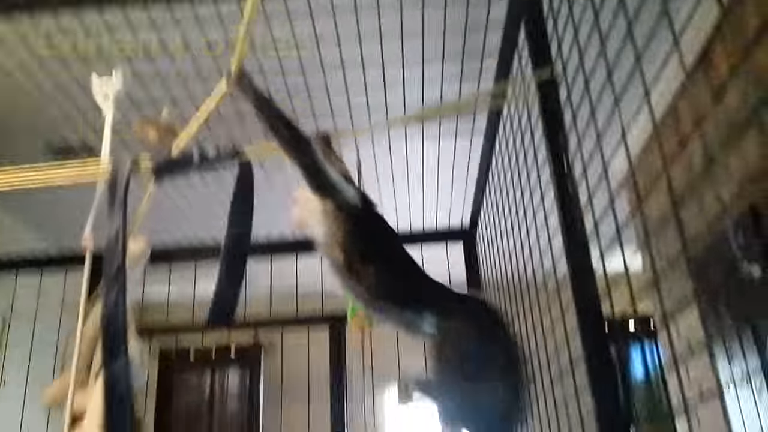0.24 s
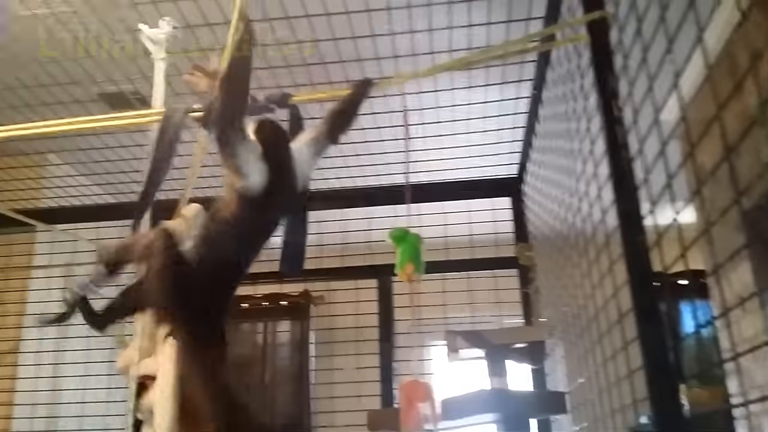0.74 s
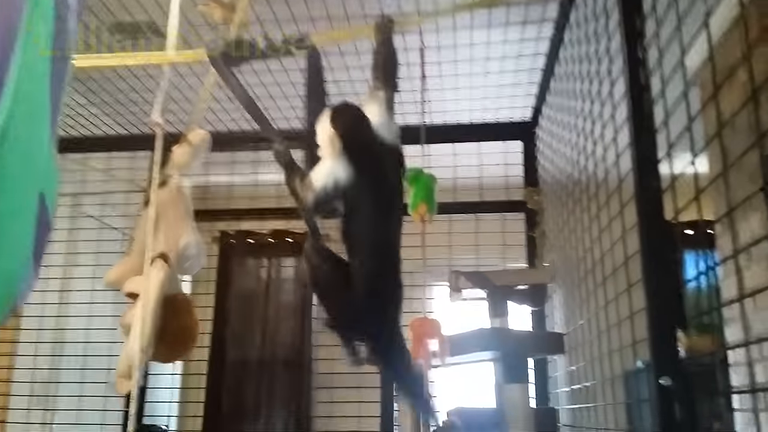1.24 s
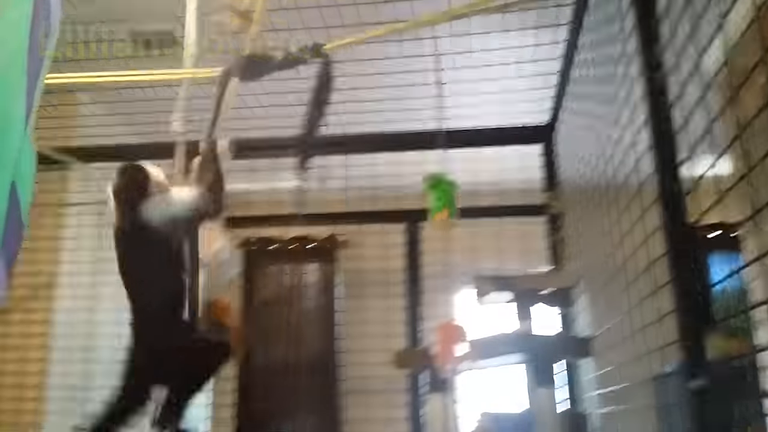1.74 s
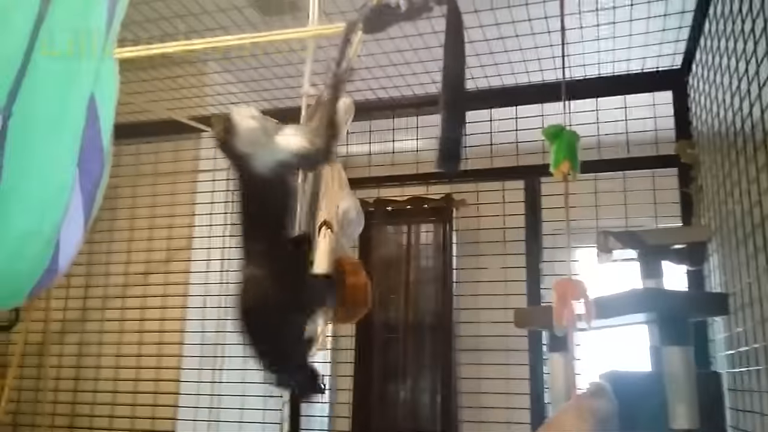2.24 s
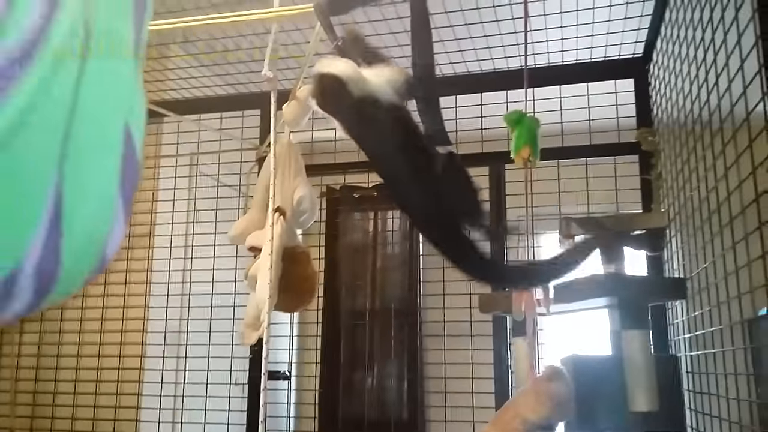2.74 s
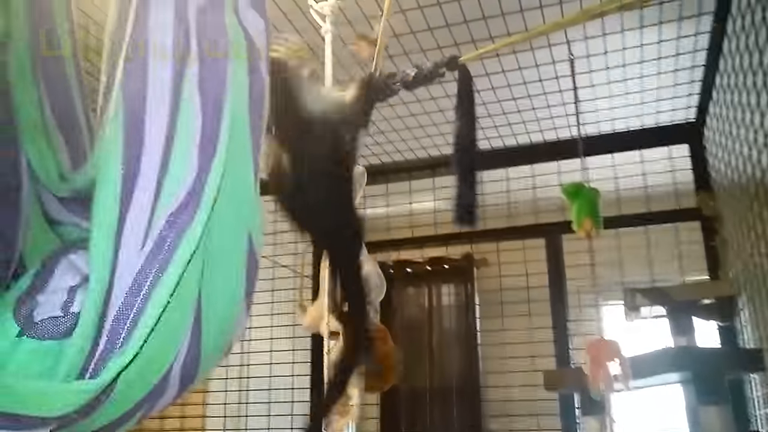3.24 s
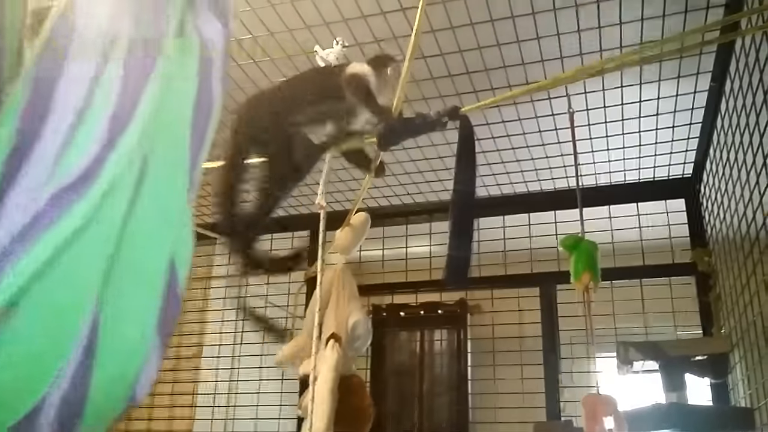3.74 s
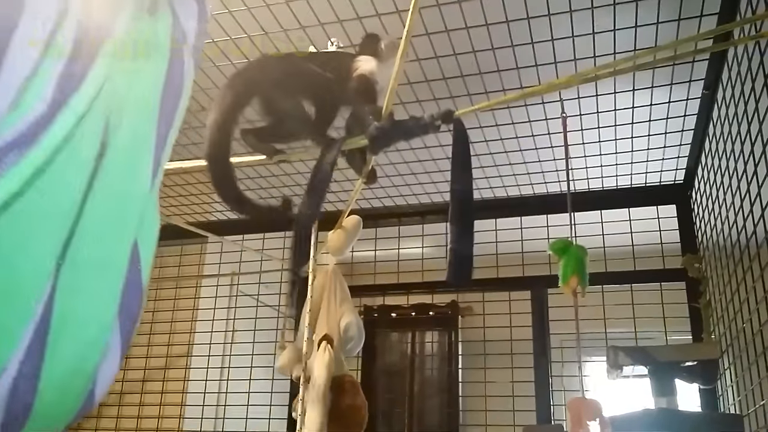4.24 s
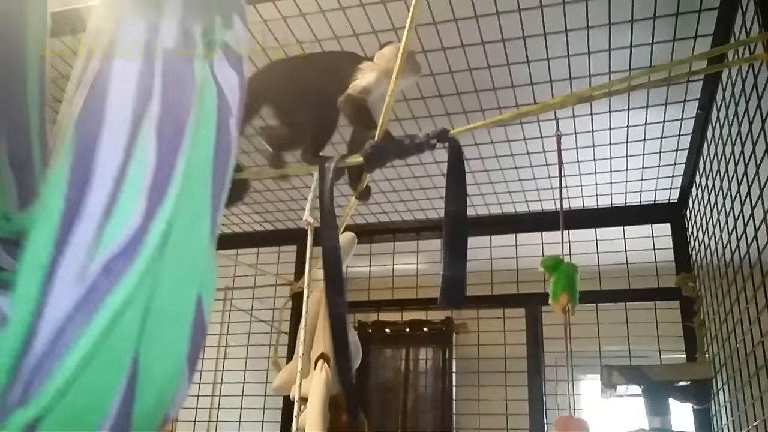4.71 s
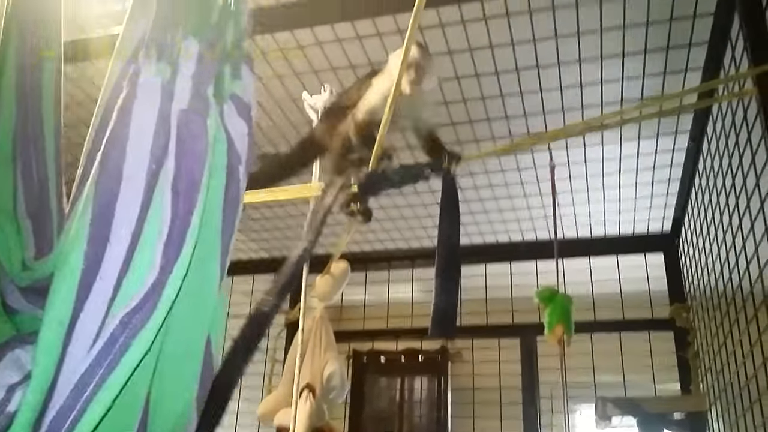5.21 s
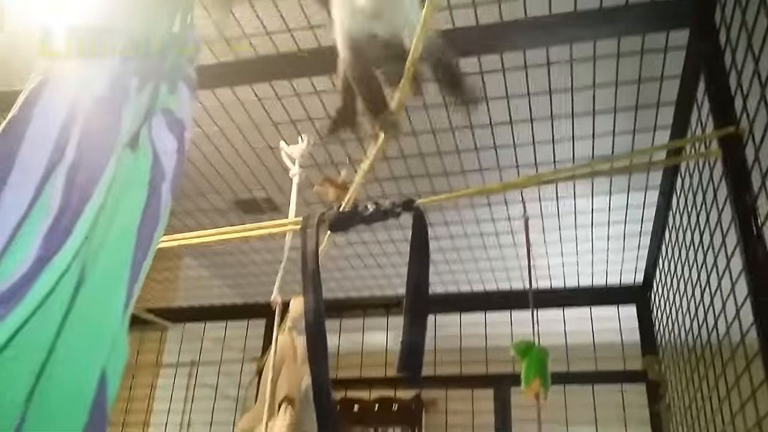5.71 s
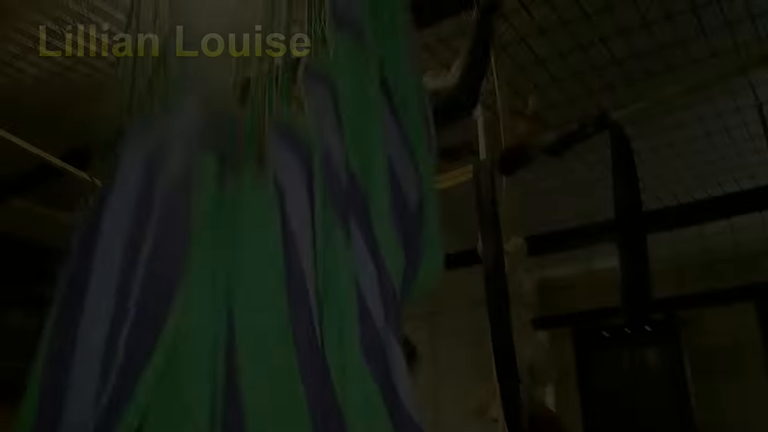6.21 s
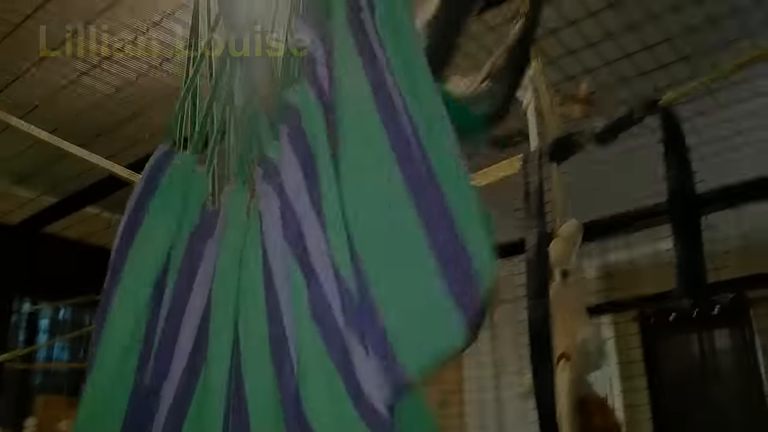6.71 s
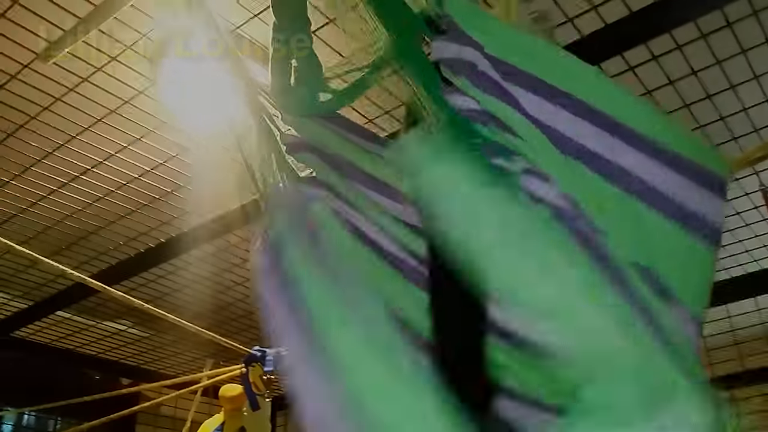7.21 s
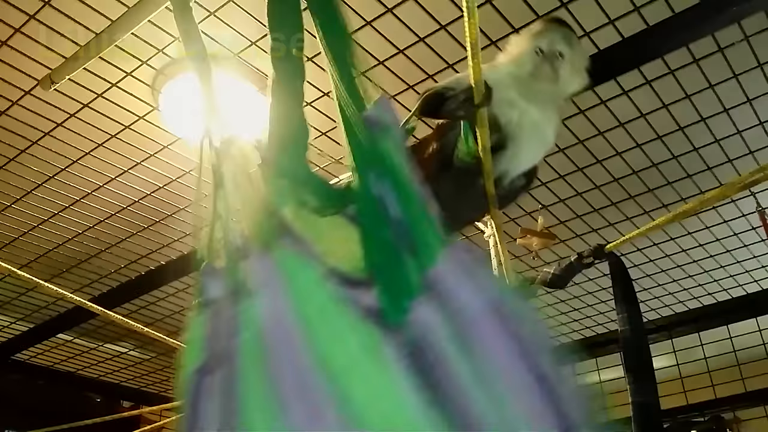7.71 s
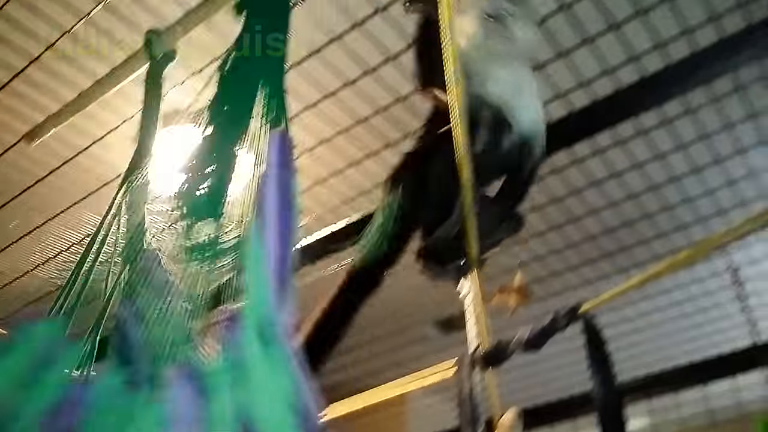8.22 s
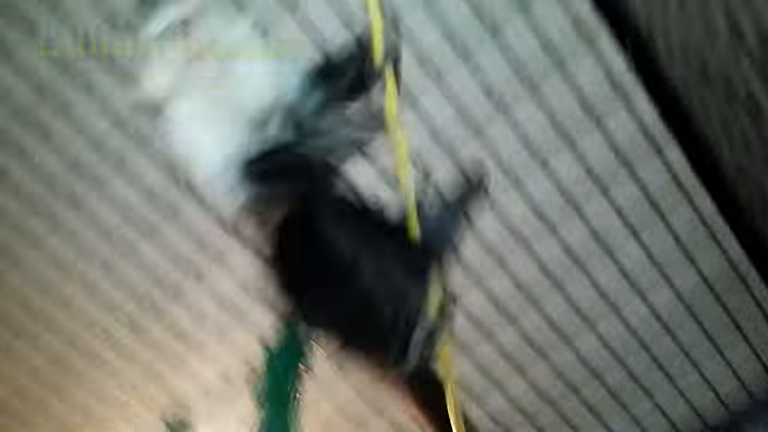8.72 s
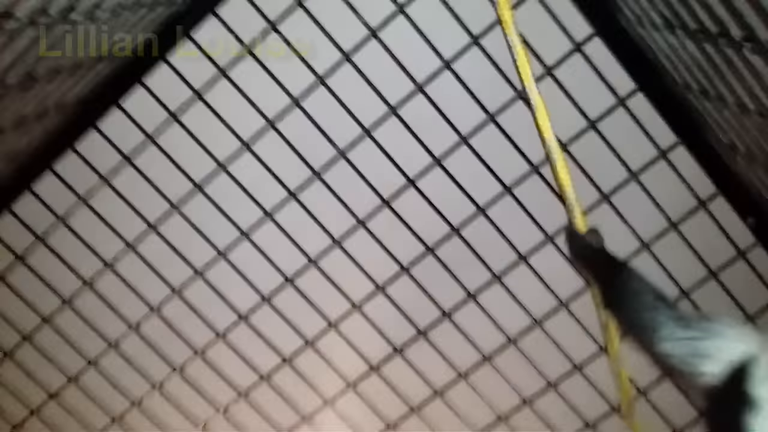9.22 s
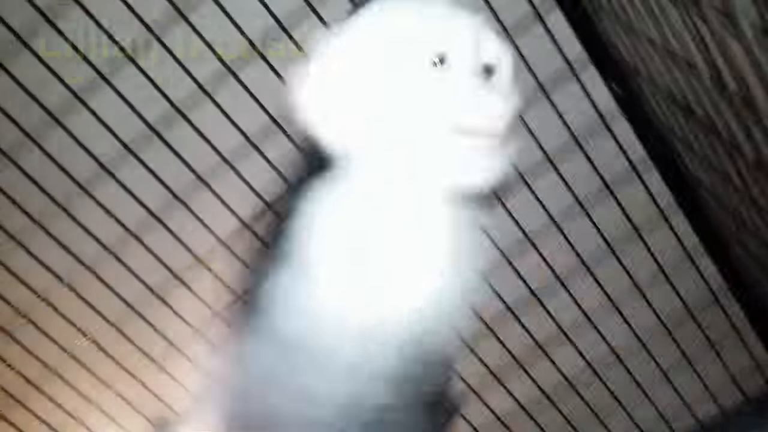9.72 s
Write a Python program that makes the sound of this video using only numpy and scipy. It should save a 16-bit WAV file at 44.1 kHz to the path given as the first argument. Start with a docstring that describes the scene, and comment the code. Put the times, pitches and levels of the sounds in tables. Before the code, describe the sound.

Inside a wire enclosure with a slight room echo, a monkey scrambles about, making soft thuds, rope scuffs and small rattles of the mesh. It chirps in quavering, sliding notes and soft whines almost throughout, breaking into three very short, louder shrieks in the second half. Close clicks and brushing on the microphone come at the opening and most sharply at the end, over a faint rumble and rustle.

```python
"""A small monkey scrambles about a wire-mesh enclosure in a hard-walled room.
First the listening phone is tapped and brushed. From 0.7 s the monkey twitters in gliding whistles,
with reedy whines between, while its hands and feet scuff ropes and set the mesh ringing.
At 3.7 s a bump makes the phone's support hum. Near 5.0, 5.7 and 8.4 s air forced through a tight throat
gives harsh shrieks. Sharp taps on the phone end the scene. Throughout, the phone turns the pauses down."""
import sys
import numpy as np
from scipy import signal
from scipy.fft import irfft, next_fast_len
from scipy.io import wavfile
from scipy.ndimage import uniform_filter1d

SR = 44100
rng = np.random.default_rng(int(sys.argv[2]) if len(sys.argv) > 2 else 0)


def waveform_to_disk(signal):
    """Save audio, clipped to [-1, 1], as 16-bit WAV at the path in sys.argv[1]."""
    frames = np.transpose(np.atleast_2d(signal))
    scaled = np.clip(frames, -1, 1) * 32767
    samples = np.round(scaled).astype(np.int16)
    wavfile.write(sys.argv[1], SR, samples)


N = 438787
TIME = np.arange(N) / SR


def from_db(db):
    """Amplitude ratio of a level: tenfold for every 20 dB."""
    return np.exp(np.asarray(db) * (np.log(10) / 20))


def rms_one(x):
    """Normalisation to unit mean power."""
    return x / np.sqrt(np.mean(x ** 2) + 1e-20)


def at_hz(points, hz):
    """Interpolation on a logarithmic frequency axis."""
    freqs, values = np.transpose(points)
    return np.interp(np.log(np.maximum(hz, 1)), np.log(freqs), values)


def drift(corner_hz):
    """Random fluctuation: low-pass filtered noise of unit power."""
    pole = np.exp(-80 * np.pi * corner_hz / SR)
    white = rng.standard_normal(N // 40 + 2002)   # one value every 40 samples
    slow = signal.lfilter([1], [1, -2 * pole, pole * pole], white)[2000:]
    return np.interp(np.arange(N) / 40, np.arange(len(slow)), rms_one(slow))


def noise(spectrum, size=N):
    """Spectral shaping of white noise, at unit power."""
    padded = next_fast_len(size, real=True)
    hz = np.fft.rfftfreq(padded, 1 / SR)
    white = rng.standard_normal(len(hz)) + 1j * rng.standard_normal(len(hz))
    return rms_one(irfft(white * from_db(at_hz(spectrum, hz)), padded)[:size])


def stereo_noise(spectrum, correlation):
    """Partial coherence: the sum of an in-phase and an antiphase noise."""
    common = np.sqrt((1 + correlation) / 2) * noise(spectrum)
    opposed = np.sqrt((1 - correlation) / 2) * noise(spectrum)
    return common + opposed * [[1], [-1]]


def impulses(rows):
    """Ideal impacts: one impulse for each (t/s, level/dB)."""
    out = np.zeros(N)
    for t, db in rows:
        out[min(int(t * SR), N - 1)] += from_db(db)
    return out


def ring(force, modes):
    """Modal superposition: each blow excites every damped mode with a random strength."""
    out = 0
    for hz, db, t60 in modes:
        r, w = from_db(-60 / (t60 * SR)), 2 * np.pi * hz / SR   # pole radius and angle
        blows = force * from_db(db + 2 * rng.standard_normal(N))
        out = out + signal.lfilter([0, np.sin(w)], [1, -2 * r * np.cos(w), r * r], blows + 1e-18)
    return out


def swell(t, half_length, rise=1):
    """Gaussian envelope about t, its rise time scaled by `rise`: samples covered and gain."""
    span = np.flatnonzero(abs(TIME - t) < 4 * half_length)
    lag = (TIME[span] - t) / half_length
    return span, np.exp(-.5 * np.where(lag < 0, lag / rise, lag) ** 2)


def envelope(t, length, attack_s, release_s):
    """Attack, hold and exponential decay: samples covered, time since onset and gain."""
    span = np.arange(max(int(t * SR), 0), min(int((t + length + 8 * release_s) * SR), N))
    age = np.maximum(TIME[span] - t, 0)
    rise = np.sin(np.pi / 2 * np.minimum(age / attack_s, 1))
    return span, age, rise * np.exp(-np.maximum(age - length, 0) / release_s)


def strokes(rows):
    """Upper envelope of events (t/s, length/s, level/dB, attack/s, release/s)."""
    gain = np.zeros(N)
    for t, length, db, attack_s, release_s in rows:
        span, _, shape = envelope(t, length, attack_s, release_s)
        gain[span] = np.maximum(gain[span], from_db(db) * shape)
    return gain


def glides(notes, attack_s, release_s, sag_db):
    """Pitch and gain of one throat: each note glides exponentially and loses sag_db on the way."""
    pitch, gain = np.full(N, float(notes[0][2])), np.zeros(N)
    for t, length, first_hz, last_hz, db in notes:
        span, age, shape = envelope(t, length, attack_s, release_s)
        along = np.minimum(age / length, 1)
        pitch[span] = first_hz * (last_hz / first_hz) ** along
        gain[span] = np.maximum(gain[span], from_db(db - sag_db * (along - 1.5)) * shape)
    return pitch, gain


def room(x, direct_db, lag_s):
    """Reverberation: direct sound reaches the left port first; reflections last longest in the bass."""
    decay_times = [(100, 0.93), (1000, 0.33), (2500, 0.31), (5500, 0.27), (9000, 0.31), (16000, 0.2)]   # reverberation time: f/Hz, T60/s
    t = TIME[:int(.7 * SR)]
    edges_hz = np.geomspace(60, 17000, 9)
    white, tail = rng.standard_normal((2, len(t))), 0
    for low, high in zip(edges_hz, edges_hz[1:]):
        band = signal.sosfilt(signal.butter(2, [low, high], "band", fs=SR, output="sos"), white)
        tail = tail + band * np.exp(-np.log(1000) * t / at_hz(decay_times, np.sqrt(low * high)))
    tail = tail * (t > .002)
    response = tail / np.sqrt(np.sum(tail ** 2, axis=1, keepdims=True))
    response[0, 0] += from_db(direct_db)
    response[1, int(lag_s * SR)] += from_db(direct_db)
    return signal.fftconvolve(x[None], response, axes=1)[:, :N] / np.hypot(1, from_db(direct_db))


def hiss(level_db=-71):
    """Self-noise of the microphone: steady and nearly incoherent between the sides."""
    spectrum = [(100, 4), (500, 15.5), (2000, 6.5), (6000, -8.5), (10000, 0.5), (15500, 3)]   # microphone noise: f/Hz, level/dB
    return from_db(level_db) * stereo_noise(spectrum, correlation=.1)


def background(rumble_db=3, rustle_db=3, rest_db=-71, attack_s=.03, release_s=.035, rustle_exponent=1.31):
    """Modulated noise floor: low rumble and rustle swell around the calls and sink in the pauses."""
    rises = [(.06, .14, -70), (0.65, 0.73, -66.5), (1.456, 0.51, -67), (2.042, 0.58, -64.5),
             (3.16, 0.34, -74), (3.38, .19, -68.5), (3.738, 0.078, -61.5), (3.971, 0.21, -67.5),
             (4.35, 0.74, -68.5), (4.994, 0.26, -63.5), (5.306, .16, -68), (5.626, 0.19, -66.5),
             (5.968, 0.48, -68), (6.52, 0.43, -69.5), (7.006, 0.26, -68), (7.289, 2.02, -66),
             (8.968, .24, -62), (9.215, 0.28, -66.5), (9.865, 0.055, -64.5)]   # swells of the background: t/s, length/s, level/dB
    rumble_spectrum = [(20, -25), (35, -31.5), (58, 6), (95, -2.5), (150, 2.5), (235, 3), (370, -3),
                       (525, -7.5), (900, -10.5), (1300, -14), (2500, -77.5)]   # background rumble: f/Hz, level/dB
    rustle_spectrum = [(300, -9), (700, -11), (1500, -6), (3000, -6), (6000, -10.5), (8500, -17.5),
                       (15500, -32)]   # background rustle: f/Hz, level/dB
    rumble_gain = np.hypot(from_db(rest_db), strokes([(*rise, attack_s, release_s) for rise in rises]))
    rustle_gain = rumble_gain * rms_one(rumble_gain) ** (rustle_exponent - 1)
    rumble = from_db(rumble_db + 1.5 * drift(26)) * stereo_noise(rumble_spectrum, correlation=.5)
    rustle = from_db(rustle_db + 1.5 * drift(50)) * stereo_noise(rustle_spectrum, correlation=.08)
    return rumble_gain * rumble + rustle_gain * rustle


def thuds(level_db=-10):
    """Structure-borne sound: soft landings excite the low modes of the frame."""
    landings = [(0.275, -58), (0.664, -74), (1.467, -46.5), (1.797, -52), (2.141, -49), (2.591, -49),
                (3.089, -51), (5.208, -57), (7.698, -44.5), (9.029, -48), (9.212, -39), (9.887, -56)]   # blows on the frame: t/s, level/dB
    modes = [(62, -26, 0.13), (159, -4.5, 0.17), (255, -2.5, 0.16), (320, 1, 0.13), (460, -6, 0.1),
             (590, 0.5, 0.045)]   # frame resonances: f/Hz, level/dB, T60/s
    return from_db(level_db) * ring(impulses(landings), modes)


def brushes(level_db=6.5, grain_db=1.5):
    """Friction noise of fur and cloth sliding over the phone."""
    contacts = [(.075, 0.14, -60.5, 0.084, 0.016), (5.958, 0.01, -50.5, 0.015, 0.047),
                (8.873, 0.025, -55.5, 0.015, 0.027), (9.182, .16, -50.5, 0.029, 0.038)]   # brushing strokes: t/s, length/s, level/dB, attack/s, release/s
    spectrum = [(880, -20), (1500, -24), (2030, -9), (2470, -13.5), (2670, -10), (3000, -7.5), (3610, -13),
                (5560, -2.5), (7600, -12.5), (15500, -18)]   # friction on the case: f/Hz, level/dB
    gain = strokes(contacts) * from_db(level_db + grain_db * drift(52))
    return gain * stereo_noise(spectrum, correlation=.077)


def ticks():
    """Impulse response of the phone's case: taps excite high, strongly damped modes."""
    taps = [(.072, -20.5), (3.181, -39), (7.739, -25), (9.138, -20.5), (9.159, -21.5), (9.931, -16.5),
            (9.936, -14.5), (9.940, -26)]   # blows on the case: t/s, level/dB
    modes = [(2740, -43, 0.026), (3870, -36, 0.023), (5170, -13.5, 0.0054), (7000, -37, 0.021)]   # case resonances: f/Hz, level/dB, T60/s
    return ring(impulses(taps), modes)


def bump(t=3.733, length_s=.13, attack_s=.06, level_db=-36, ring_db=-21, rattle_db=-11, judder_db=2):
    """Resonance of the phone's bumped support: the pitch climbs as the contact stiffens."""
    rattle_spectrum = [(100, -31.5), (180, -14), (500, -5), (950, -10), (1400, -13), (2000, -4.5),
                       (3000, -17.5), (5500, -32), (9000, -54)]   # faint rattle riding on the hum: f/Hz, level/dB
    first_hz, firm_hz, firming_s, sag_db_per_s = 220, 320.7, .018, 108
    age = np.maximum(TIME - t, 0)
    pitch = firm_hz + (first_hz - firm_hz) * np.exp(-age / firming_s)
    hum = np.sqrt(2) * np.sin(2 * np.pi * np.cumsum(pitch) / SR) * from_db(judder_db * drift(64))
    rattle = from_db(rattle_db) * stereo_noise(rattle_spectrum, correlation=.7)
    contact = strokes([(t, length_s, level_db, attack_s, .0025)]) * from_db(-sag_db_per_s * age)
    ringing = strokes([(t, length_s, level_db + ring_db, attack_s, .05)])   # outlasts the contact
    return (contact + ringing) * (hum + rattle)


def scuffs(level_db=-1, grain_db=4, skirt_db=-20):
    """Sliding friction around one broad resonance; short slips start abruptly, long slides swell."""
    slides = [(1.34, -48.5, 0.023, 3780), (1.517, -51, 0.035, 1903), (1.717, -48, 0.039, 1870),
              (1.82, -44, 0.027, 1860), (1.929, -55.5, 0.042, 2120), (2.061, -51.5, 0.044, 1563),
              (2.422, -49, 0.035, 2760), (2.606, -52, 0.011, 1410), (3.35, -60.5, 0.012, 3190),
              (3.48, -54.5, 0.034, 4300), (3.526, -50.5, 0.018, 2750), (4.046, -52.5, 0.032, 3490),
              (4.185, -45.5, 0.015, 3240), (4.515, -45.5, 0.031, 3050), (4.597, -45, 0.044, 2620),
              (4.751, -40, 0.011, 4050), (5.456, -50.5, 0.028, 1800), (6.389, -47.5, 0.017, 3620),
              (6.531, -55, 0.019, 4640), (6.849, -42.5, 0.017, 3400), (7.14, -53.5, 0.02, 1800),
              (7.323, -45.5, 0.016, 3540), (7.707, -53, 0.05, 2170), (7.886, -51, 0.047, 2500),
              (8.686, -39.5, 0.043, 4000), (8.998, -34, 0.016, 4150), (9.902, -54.5, 0.018, 4050)]   # hands and feet on rope and wire: t/s, level/dB, half length/s, f/Hz
    out = np.zeros(N)
    for t, db, half_length, hz in slides:
        span, shape = swell(t, half_length, rise=min(1, half_length / .021))
        spectrum = [(hz / 6, skirt_db), (hz / 1.615, -3), (hz * 1.18, 0),
                    (hz * 1.785, skirt_db), (hz * 4, -38)]
        out[span] += from_db(db + level_db) * shape * noise(spectrum, len(span))
    return out * rms_one(from_db(grain_db * drift(250)))


def mesh(level_db=-9, chatter_per_s=400, settle_s=.025, chatter_db=-6):
    """Impact excitation: a grab rings the panel, and crossed wires chatter until it settles."""
    grabs = [(0.666, -52), (1.329, -52.5), (1.469, -62), (1.713, -46.5), (1.804, -41.5), (1.899, -53),
             (2.592, -42), (3.087, -58), (3.444, -70), (4.74, -52.5), (5.469, -69), (6.378, -69),
             (7.701, -60), (8.981, -49), (9.209, -37.5)]   # blows on the mesh: t/s, level/dB
    modes = [(507, -14, 0.027), (794, -5.5, 0.17), (1070, -2, .03), (1162, -1.5, 0.082),
             (1587, -12.5, 0.041), (2027, 20, 0.022), (2530, 0, 0.024), (2700, -3.5, 0.018),
             (4030, 6.5, 0.016), (4100, -1.5, 0.018), (5300, -2, 0.024)]   # wire panel, damped by its fixings: f/Hz, level/dB, T60/s
    blows = impulses(grabs)
    shaking = signal.lfilter([1], [1, -np.exp(-1 / (settle_s * SR))], blows + 1e-18)
    touches = (rng.random(N) < chatter_per_s / SR) * rng.standard_normal(N)
    return from_db(level_db) * ring(blows + from_db(chatter_db) * shaking * touches, modes)


def whines(level_db=6, flutter_db=4):
    """Formant filtering: the throat favours harmonics of a wavering, reedy tone near 2 and 4 kHz."""
    notes = [(.065, 0.15, 812, 767, -72), (1.135, 0.18, 885, 1058, -54.5), (1.49, 0.08, 1380, 1293, -52.5),
             (3.225, 0.19, 959, 1031, -65.5), (3.46, 0.089, 1015, 951.6, -55.5),
             (5.485, .1, 1079, 1040, -61), (5.61, 0.042, 1055, 1019, -46), (7.005, 0.097, 1238, 1310, -59),
             (7.125, 0.073, 1046, 972.5, -55), (7.35, .125, 1285, 1492, -55),
             (7.55, 0.26, 1077, 1011, -51.5), (8.565, 0.039, 870, 927, -58), (8.63, .14, 965, 1400, -53.5)]   # soft whines: t/s, length/s, first f/Hz, last f/Hz, level/dB
    formants = [(1400, -9), (2000, 4.5), (2700, -12.5), (3200, -15), (4050, 0), (4800, -8), (5400, -22),
                (6700, -20.5), (7500, -42)]   # throat resonances: f/Hz, level/dB re the fundamental
    pitch, gain = glides(notes, attack_s=.006, release_s=.008, sag_db=-3)
    on = gain > 0
    wavering_hz = pitch * (1 + .016 * drift(70) + .012 * drift(400))
    phase = 2 * np.pi * np.cumsum(wavering_hz)[on] / SR
    overtones = sum(from_db(at_hz(formants, k * pitch[on])) * np.sin(k * phase) for k in range(2, 6))
    tone = np.zeros(N)
    tone[on] = np.sin(phase) + overtones
    flutter = rms_one(from_db(flutter_db * drift(30))) * (1 + .3 * drift(350))
    return gain * tone * flutter * from_db(level_db)


def shrieks(level_db=3.5, rough_db=4):
    """Source and filter: air forced through a tight throat in chaotic pulses excites its resonance."""
    cries = [(5.039, -22.5, 0.023, 4440), (5.676, -30.5, 0.021, 7360), (8.371, -20.5, .017, 6030)]   # harsh cries: t/s, level/dB, half length/s, throat resonance f/Hz
    spectrum = [(300, -45), (900, -29), (1400, -18), (2000, -6), (3000, -4), (4200, -1), (5700, 0),
                (6700, -1), (7500, -17), (9500, -21), (12000, -28), (15500, -33)]   # colour common to the cries: f/Hz, level/dB
    out = np.zeros(N)
    hz = np.geomspace(300, 16000, 80)
    for t, db, half_length, throat_hz in cries:
        span, shape = swell(t, half_length)
        formant_db = 8 / (1 + (np.log2(hz / throat_hz) / .2) ** 2)
        breath = noise(np.c_[hz, at_hz(spectrum, hz) + formant_db], len(span))
        out[span] += from_db(db + level_db) * shape * breath
    return out * rms_one(from_db(rough_db * drift(400)))


def twitter(level_db=0, flutter_db=4, overtone_db=-17, hoarse_db=-6, rasp_db=-5):
    """Amplitude modulation: irregular shaking of the folds puts side bands around a quavering whistle."""
    notes = [(.678, .036, 3850, 4100, -38), (.728, 0.051, 2380, 2614, -44.5),
             (.787, 0.036, 2867, 3354, -40.5), (.83, 0.053, 2500, 2097, -43.5),
             (.938, 0.033, 4590, 4796, -46.5), (.978, 0.039, 4510, 3874, -38.5),
             (1.03, 0.052, 2910, 2464, -57.5), (1.09, 0.1, 2030, 1782, -46),
             (1.21, 0.16, 2245, 1873, -51.5), (1.965, 0.058, 1746, 2140, -52.5),
             (2.035, 0.052, 4350, 4514, -50), (2.112, 0.033, 3760, 4350, -36),
             (2.155, .10, 3140, 2050, -47.5), (2.26, 0.12, 1946, 1760, -51),
             (2.375, .018, 2305, 2450, -39.5), (2.395, 0.053, 3905, 5040, -37.5),
             (2.45, 0.047, 2693, 1864, -36.5), (2.51, 0.033, 2917, 3453, -40),
             (2.55, 0.053, 2660, 2253, -37.5), (3.975, 0.063, 3550, 2900, -56),
             (4.04, 0.098, 2260, 1746, -48.5), (4.385, 0.11, 2140, 1900, -51),
             (4.57, 0.14, 1627, 1683, -57.5), (4.765, .12, 1780, 1950, -52.5),
             (4.895, 0.078, 2330, 1920, -51.5), (5.378, 0.04, 1908, 2040, -52),
             (5.58, 0.046, 1447, 1650, -55), (6.022, .035, 2286, 3173, -53.5),
             (6.063, 0.053, 4190, 3734, -42.5), (6.128, 0.057, 2317, 3068, -47),
             (6.205, 0.023, 3290, 3344, -42), (6.228, 0.044, 2390, 2860, -46),
             (6.28, 0.088, 2230, 2100, -45.5), (6.50, 0.074, 1497, 1910, -63),
             (6.595, 0.11, 3414, 3590, -52.5), (6.69, 0.11, 2743, 2030, -56),
             (6.78, .05, 3950, 3810, -47.5), (7.48, .075, 1750, 2350, -51.5), (7.57, 0.11, 3870, 3400, -43),
             (7.70, 0.12, 2418, 1805, -50), (7.85, .085, 2265, 1736, -49), (7.96, .12, 1680, 1820, -55.5),
             (8.07, 0.024, 3100, 3350, -48.5), (8.097, .038, 3850, 4590, -37),
             (8.138, 0.0346, 2530, 2800, -45), (8.195, .035, 3050, 3450, -37.5),
             (8.232, 0.068, 2510, 2294, -46.5), (8.77, .11, 1480, 1900, -54),
             (8.89, 0.099, 2300, 1660, -46), (9.04, .13, 2150, 1560, -50.5), (9.222, .045, 3890, 4830, -39),
             (9.28, 0.025, 2473, 3330, -36), (9.336, 0.02, 3303, 3440, -32),
             (9.37, .052, 2494, 2205, -37.5)]   # runs of gliding notes: t/s, length/s, first f/Hz, last f/Hz, level/dB
    throat = [(900, 0), (2000, 7), (2900, 4), (4000, 8), (5500, 3), (6400, -3), (7200, 0), (8400, -3),
              (9600, -18), (14000, -30)]   # how the throat favours partials: f/Hz, level/dB
    rasp_spectrum = [(800, -41.5), (1500, -22), (2000, 5.5), (2500, 2), (3300, -5.5), (3900, -20),
                     (5000, -22), (7000, -23.5), (10000, -37.5)]   # air in the narrowed throat: f/Hz, level/dB
    pitch, gain = glides(notes, attack_s=.003, release_s=.005, sag_db=1.5)
    quaver_hz = np.minimum(pitch, 2600) * (.045 * drift(80) + .012 * drift(300))
    phase = 2 * np.pi * np.cumsum(pitch + quaver_hz) / SR
    octave_db = at_hz(throat, 2 * pitch) - at_hz(throat, pitch) + overtone_db
    whistle = np.sqrt(2) * (np.sin(phase) + from_db(octave_db) * np.sin(2 * phase))
    shaking = noise([(50, -2), (220, 0), (450, -7), (900, -26), (2000, -60)])
    hoarse = whistle * (1 + from_db(hoarse_db) * shaking) * from_db(flutter_db * drift(58))
    middle_register = np.exp(-(np.log2(pitch / 2500) / .6) ** 2)
    rasp = from_db(rasp_db) * middle_register * noise(rasp_spectrum)
    return gain * from_db(level_db) * (hoarse + rasp)


def scene(near_left_db=-1, near_right_db=3):
    """Superposition: voice, scuffs and mesh reverberate, the rest is dry; the right port hears more."""
    place = [(0, -4), (4.8, -5), (5.1, -5), (5.7, -6), (6.2, -1), (7.8, -1.5), (8.35, -4), (8.7, -5),
             (9.4, 0)]   # where the monkey is: t/s, left minus right level/dB
    calls = room(twitter() + whines(), direct_db=-10, lag_s=.0004)
    cries = room(shrieks(), direct_db=-3, lag_s=.0004)
    cage = room(scuffs() + mesh(), direct_db=1.5, lag_s=.00029)
    balance_db = np.interp(TIME, *np.transpose(place))
    monkey = (calls + cries + cage) * from_db(balance_db * [[.5], [-.5]])
    near = thuds() + brushes() + ticks() + bump() + background() + hiss()
    return monkey + near * from_db([[near_left_db], [near_right_db]])


def record(dry):
    """Downward expansion: the phone lowers tails and pauses, then a steep low-pass cuts the top."""
    threshold_db, depth_db, knee_db, cutoff_hz = -57, 4.5, 4, 15850
    power = uniform_filter1d(np.mean(dry ** 2, axis=0), size=1300)
    level_db = 10 * np.log10(np.maximum(power, 1e-12))
    quiet = .5 + .5 * np.tanh((threshold_db - level_db) / knee_db)
    low_pass = signal.ellip(10, .2, 70, cutoff_hz, fs=SR, output="sos")
    return signal.sosfilt(low_pass, dry * from_db(-depth_db * quiet))


dry = scene()
out = record(dry)
waveform_to_disk(out)
```